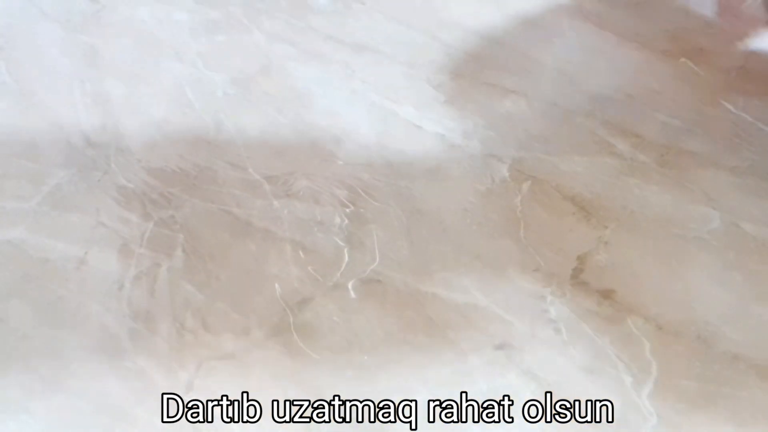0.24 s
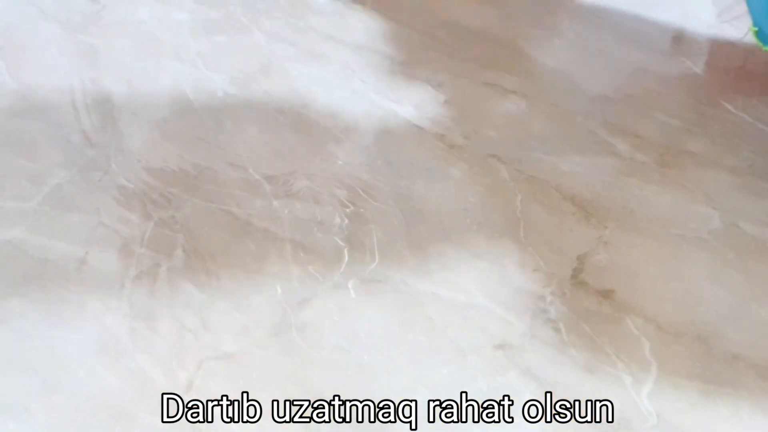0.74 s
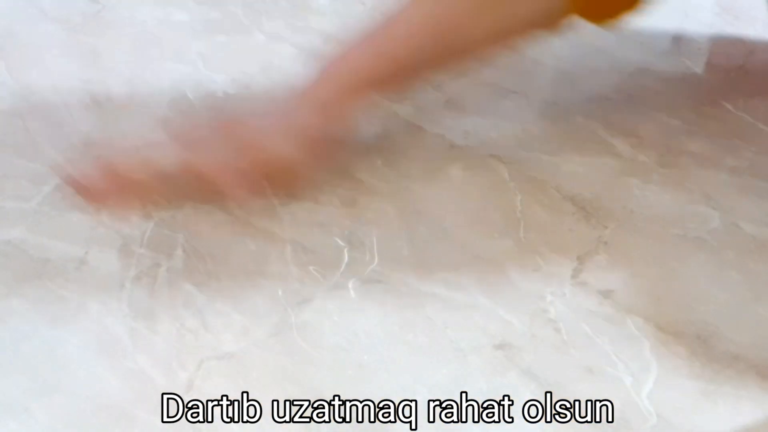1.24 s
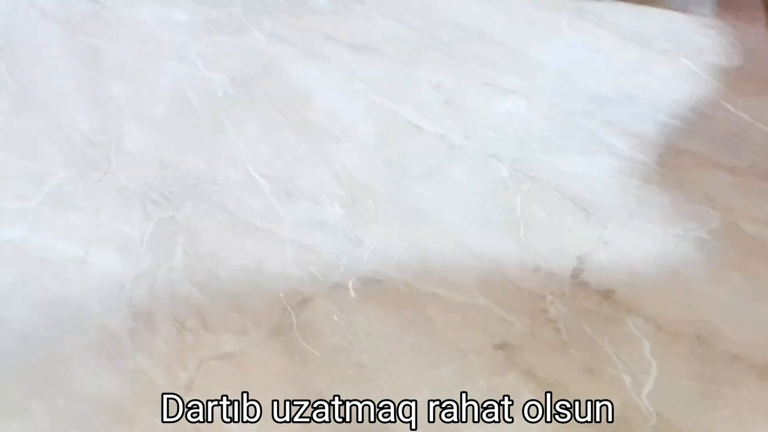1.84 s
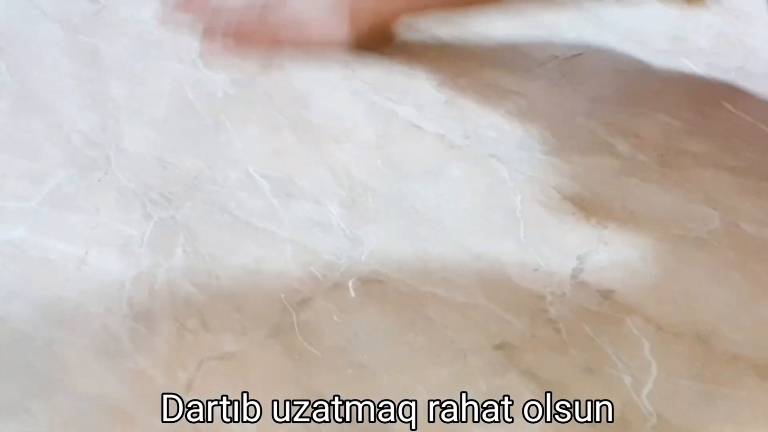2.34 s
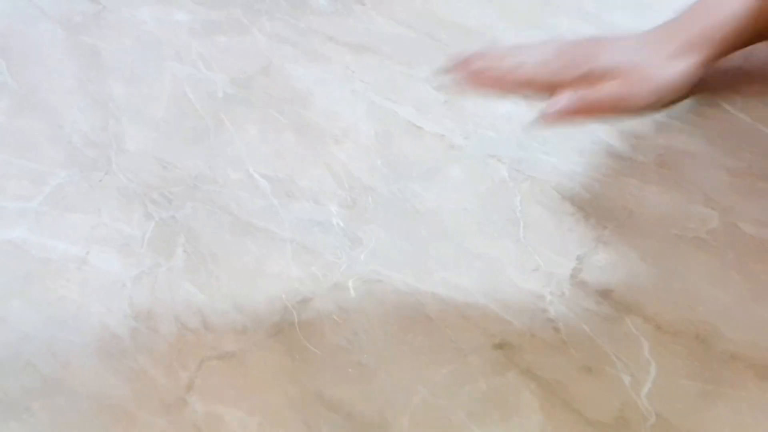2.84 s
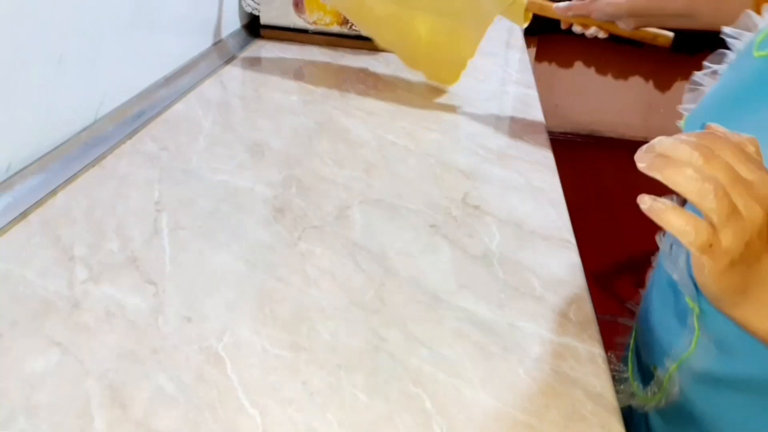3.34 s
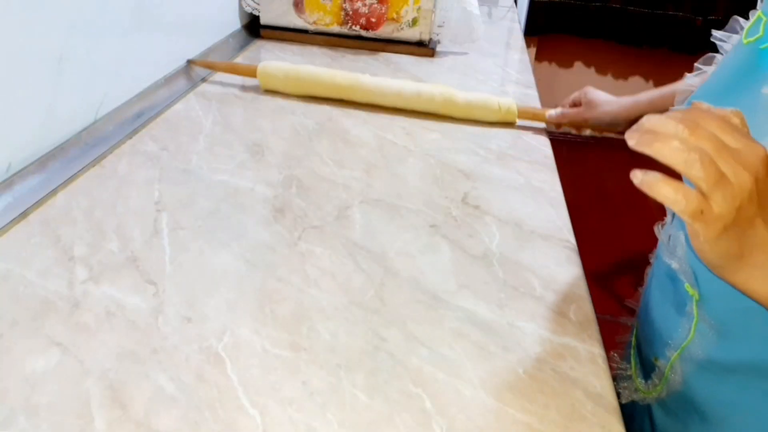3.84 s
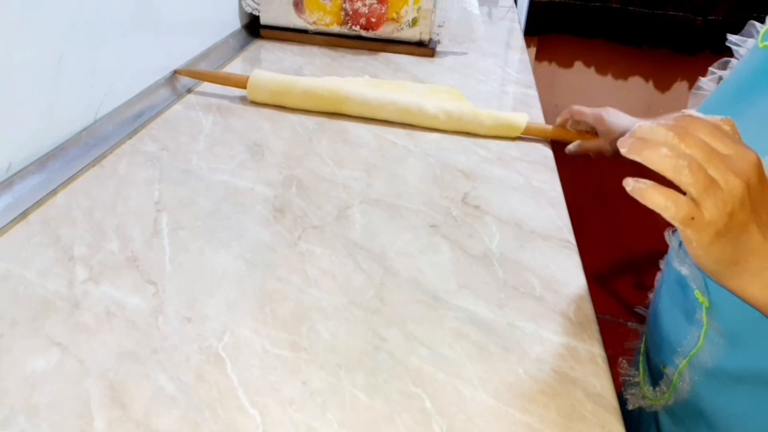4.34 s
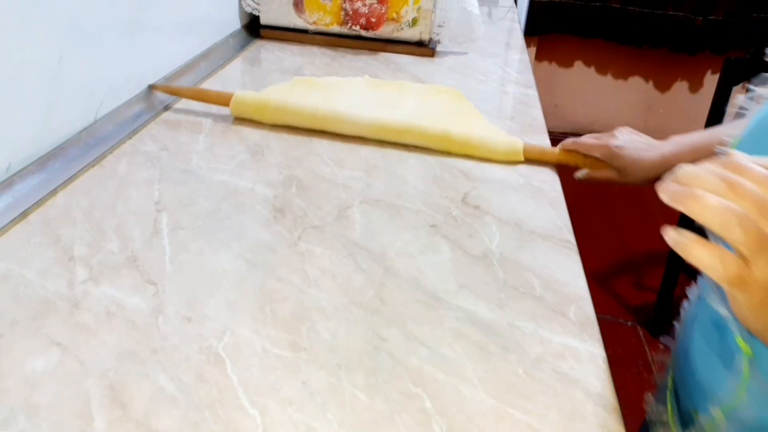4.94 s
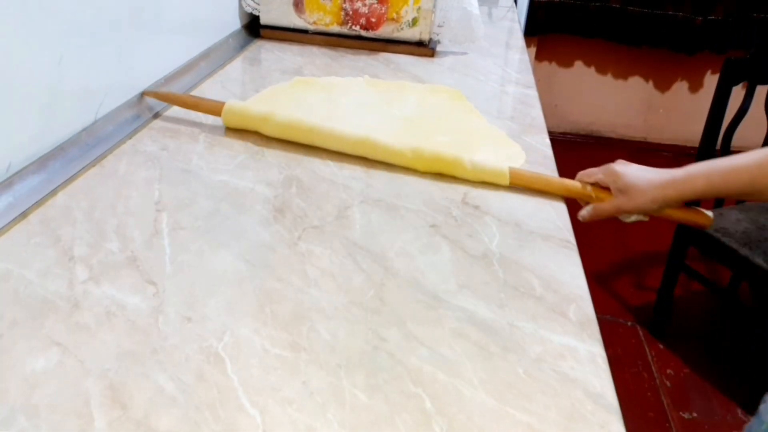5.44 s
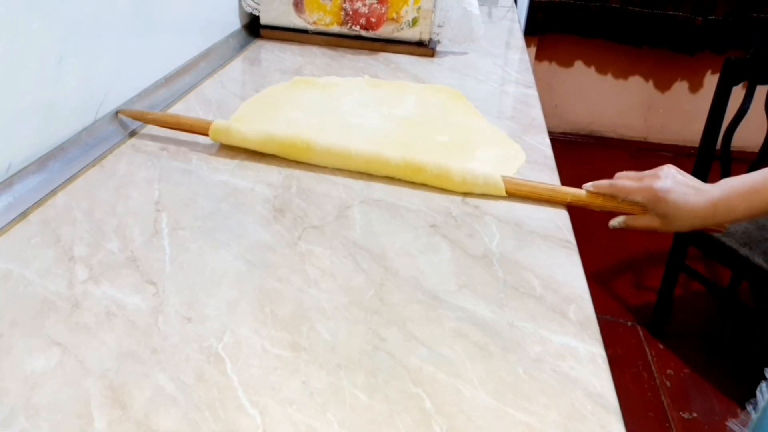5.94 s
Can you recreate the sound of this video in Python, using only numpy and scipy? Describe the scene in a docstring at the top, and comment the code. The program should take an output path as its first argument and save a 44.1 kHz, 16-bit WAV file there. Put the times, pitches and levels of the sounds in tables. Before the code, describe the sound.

A quiet, hollow appliance drone runs throughout a small, hard kitchen, heard closely in stereo, slightly to the right. From 0.1 s a palm sweeps flour across stone: a fine, bright hiss swells to about 0.6 s, surges again, and fades by 1.2 s. Two dull, low pats land at 1.7 and 1.9 s, then more strong swishes peak around 2.1 and 2.35 s, with a weaker one trailing until the hiss stops abruptly at 3.3 s. Faint dough scuffs follow. A soft, heavy thump at 3.75 s precedes the loudest event, a hard wooden knock on stone at 3.97 s with a bright tick, quick softer rebound, short ringing tail and deep boom. Near quiet follows with faint rustling. At 5.1 s muffled dough thumps and a light knock cluster; at 5.6 s a duller wooden knock comes with a brief low rumble, then a soft thump at 5.8 s and fading rustle.

```python
"""Floured counter, dough and rolling pin

A palm sweeps flour over a stone kitchen counter in long hissing strokes (shaped noise) and pats it twice.
A thin wooden pin wrapped in dough is laid down and knocks on the slab (struck modes and a dense ring);
the sheet rustles and thumps as it is unrolled. The small hard room rings after each blow.
An appliance drones in the background (low noise with one resonance)."""
import sys
import numpy as np
from scipy import signal
from scipy.fft import rfft, irfft, next_fast_len
from scipy.io import wavfile
from scipy.ndimage import map_coordinates

SR = 44100
rng = np.random.default_rng(int(sys.argv[2]) if len(sys.argv) > 2 else 0)


def log_audio(samples):
    """Write samples as a 16-bit WAV file to the path given in sys.argv[1]."""
    # one column per channel
    frames = np.atleast_2d(samples).T
    # limit to full scale, then quantise
    limited = np.clip(frames, -1, 1)
    pcm = np.round(limited * 32767).astype(np.int16)
    wavfile.write(sys.argv[1], SR, pcm)


N = 273420  # length in samples


def amp(db):
    """Amplitude factor of a level in dB."""
    return 10 ** (np.asarray(db) / 20)


def unit(x):
    """x scaled to rms 1."""
    return x / np.sqrt(np.mean(x ** 2) + 1e-20)


def along(points, hz):
    """(Hz, value) points read on a log frequency axis."""
    f, v = np.transpose(points)
    return np.interp(np.log(hz + 1), np.log(f + 1), v)


def curve(rows):
    """(s, value) rows as one value per sample."""
    return np.interp(np.arange(N) / SR, *np.transpose(rows))


def wobble(rate):
    """A smooth random curve, rate knots a second."""
    knots = rng.standard_normal(int(N * rate / SR) + 4)
    return map_coordinates(knots, [np.arange(N) * rate / SR])


def filtered(x, response):
    """x with its spectrum multiplied by a response of frequency."""
    n = x.shape[-1]
    m = next_fast_len(n + 8192)  # padded with silence
    return irfft(rfft(x, m) * response(np.fft.rfftfreq(m, 1 / SR)), m)[..., :n]


def noise(gain, n=N):
    """Diffuse stereo noise of rms 1: alike in the bass, mostly unrelated in the treble."""
    # Each row: frequency in Hz, likeness of the left and right microphones (1 = the same).
    alike = [(60, 0.99), (130, 0.86), (290, 0.87), (640, 0.49), (1400, 0), (3000, 0.19), (7000, 0)]

    def mid_side_gain(hz):
        turn = np.arccos(np.clip(along(alike, hz), -1, 1)) / 2
        return gain(hz) * np.array([np.cos(turn), np.sin(turn)])

    mid, side = filtered(rng.standard_normal((2, n)), mid_side_gain)
    return unit(np.array([mid + side, mid - side]))


def shaped(points):
    """Gain of a (Hz, dB) spectrum."""
    return lambda hz: amp(along(points, hz))


def resonance(centre_hz, width_hz):
    """Gain of one resonance, halved at width_hz from its centre."""
    return lambda hz: 1 / (1 + ((hz - centre_hz) / width_hz) ** 2)


def arch(length):
    """A smooth rise and fall, length seconds long."""
    return np.sin(np.linspace(0, np.pi, int(length * SR)))


def add(track, s, sound):
    """Mix a sound into the track from time s in seconds."""
    part = track[:, round(s * SR):][:, :sound.shape[-1]]
    part += sound[..., :part.shape[1]]


def leaning(x, points):
    """The two microphones hear x with different strength; points give left over right in dB by Hz."""
    return filtered(x, lambda hz: amp(np.array([[0.5], [-0.5]]) * along(points, hz)))


def stroke(start, rise, fall, db):
    """Loudness of one movement: it follows the speed, which rises and falls smoothly, and lingers in the room."""
    linger_t60_s = 0.4
    ramp = curve([(start, 0), (start + rise, 1), (start + rise + fall, 0)])
    speed = np.sin(np.pi / 2 * ramp)
    keep = 10 ** (-6 / (linger_t60_s * SR))  # share of the power kept per sample
    power = signal.lfilter([1 - keep], [1, -keep], speed ** 2)
    return amp(db) * np.sqrt(power)


def strokes(rows):
    """Loudness of a series of movements, their powers summed."""
    return np.sqrt(sum(stroke(*row) ** 2 for row in rows))


def background():
    """An appliance's airy drone with one hollow resonance, over faint steady hiss."""
    # Each row: frequency in Hz, relative level in dB per Hz; first the drone, then the hiss.
    drone_spectrum = [(20, -40), (35, -40), (55, -13), (85, -13), (116, -3.5), (170, -18), (240, -12.5),
                      (390, -9), (500, -8.5), (800, -25), (1150, -27), (1350, -34.5), (1700, -26.5),
                      (2200, -45.5)]
    air_spectrum = [(800, -1), (2200, 15.5), (7000, -8), (10000, -1), (15500, -3.5)]
    # Each row: time in seconds, relative drone level in dB.
    drone_level = [(0.0, -57), (0.45, -53.5), (1.6, -55.5), (3.75, -54), (4.0, -57.5), (6.2, -56)]
    hollow = noise(resonance(318.0, 28.0))
    drone = amp(-1.5) * noise(shaped(drone_spectrum)) + amp(-1.5) * hollow
    level_db = curve(drone_level) + 0.92 + 0.54 * wobble(4.37)
    return amp(level_db) * drone + amp(-78) * noise(shaped(air_spectrum))


def palm():
    """Countless flour grains shear under the skin: a fine hiss that stops short with the last stroke."""
    # Each row: start in seconds, time to full speed in s, time to rest in s, relative hiss level in dB.
    sweeps = [(.11, 0.43, .07, -44.5), (.605, 0.043, 0.36, -44), (.93, 0.24, 0.26, -55),
              (1.67, 0.13, 0.16, -63.5), (1.87, 0.2, 0.24, -44.5), (2.18, 0.17, 0.092, -42.5),
              (2.62, 0.24, 0.87, -49), (3.21, 0.087, 0.11, -48.5)]
    # Each row: frequency in Hz, relative level of the flour hiss in dB per Hz.
    flour = [(710, -46), (1200, -18), (1650, -11.5), (2050, -7.5), (2680, -1.5), (3770, -0.5), (7730, 2),
             (9900, -2.5), (12000, 0), (15300, -1)]
    rub_spectrum = [(40, -29), (110, 14.5), (200, -37), (350, 11.0),
                    (700, -7.5), (1500, -17), (3000, -42), (9000, -70)]  # (Hz, dB per Hz)
    sweep_end_s, stop_s = 3.311, 0.0057  # the hiss starts to stop, and how long that takes
    moving = np.clip((sweep_end_s - np.arange(N) / SR) / stop_s + 1, 0, 1)
    loudness = np.hypot(strokes(sweeps), amp(-74))  # a faint hiss stays between strokes
    sweep = loudness * amp(1.56 * wobble(45)) * moving
    hiss = amp(1.24) * noise(shaped(flour))
    rub = amp(-14.5) * noise(shaped(rub_spectrum))
    return sweep * (hiss + rub)


def room_ring(n):
    """A fresh dense tail of counter and walls in which each frequency dies at its own speed."""
    # Each row: frequency in Hz, relative level in dB per Hz.
    clatter = [(20, -61), (60, -10.5), (140, -7), (200, -3), (300, 5), (410, -5.5), (520, -3.5),
               (800, -6.5), (980, -9.5), (1250, -7.5), (2000, -12), (3200, -13.5), (6000, -16), (15000, -7)]
    # The small hard room. Each row: frequency in Hz, t60 in seconds.
    room_t60 = [(80, 1), (300, 0.4), (1000, 0.5), (3000, 0.55), (8000, 0.75), (15000, 0.73)]
    hz, t, z = signal.stft(noise(shaped(clatter), n), SR, nperseg=256)
    decay = amp(-60 * t / along(room_t60, hz)[:, None])
    return signal.istft(z * decay, SR, nperseg=256)[1][:, :n]


def ringing(modes, t):
    """Struck modes (Hz, dB, t60 s); strength and phase vary at random from blow to blow."""
    hz, level, t60 = np.transpose(modes)[:, :, None]
    strength = amp(level + rng.standard_normal(hz.shape) - 60 * t / t60)
    # high modes reach the two microphones out of step
    apart = rng.choice([-1, 1], hz.shape) * np.minimum(hz / 1200, np.pi / 4)
    phase = rng.uniform(0, 2 * np.pi, hz.shape) + np.array([[[1]], [[-1]]]) * apart
    return np.sum(strength * np.sin(2 * np.pi * hz * t + phase), axis=1)


def blow(contact_hz, thump_db, tick_db, modes_db):
    """Palm, dough and bare pin ring the same counter; a soft contact passes only its low modes."""
    # Modes of the counter. Each row: frequency in Hz, relative level in dB, t60 in s before contact damping.
    counter = [(171.3, -3, 0.22), (205.4, -3, 0.23), (232, -7, 0.12), (268.8, 1.5, 0.14), (320, -11.5, 0.2),
               (466, -5.5, 0.34), (559, -8.5, 0.38), (627, -9, 0.37), (724, -13, 0.43), (782, -6.5, 0.26),
               (820, -12.5, 0.54), (860, -16, 0.28), (1130, -20, 0.52), (1162, -12, 0.36), (1196, -16, 0.3)]
    # Lowest bending mode of the slab: frequency in Hz, t60 in seconds before contact damping.
    slab_hz, slab_t60 = (112, 0.34)
    # Hard contact on stone. Each row: frequency in Hz, relative level in dB per Hz.
    tick_spectrum = [(500, 3), (2000, 6), (3800, -14), (5200, -1), (8000, 0), (11000, -15), (15000, -22)]
    # What the walls return of the tick. Each row: frequency in Hz, gain in dB.
    echo_gain = [(1000, -34), (2500, -1), (4000, 3.5), (7000, -2), (10000, -9.5), (15000, -17)]
    t = np.arange(SR * 3 // 4) / SR
    fade_db = -5 * np.clip((t - 0.11) / 0.1, 0, 1)  # the late ring drops by a further 5 dB
    room = room_ring(len(t))
    contact = signal.butter(2, min(contact_hz, SR / 3), fs=SR)
    ring = signal.lfilter(*contact, amp(modes_db) * ringing(counter, t) + amp(0.5) * room)
    swell = 1 - np.exp(-t / 0.021)
    thump = amp(thump_db - 4 - 60 * t / slab_t60) * swell * np.sin(2 * np.pi * slab_hz * t)
    # soft things press in slowly, then stay on the stone and damp it
    touch = (1 - np.exp(-t * contact_hz)) * amp(1.5 + fade_db - 15000 * t / contact_hz)
    # hard contact adds a bright tick, which the walls prolong
    tick = amp(tick_db - 7.5 - 60 * t / 0.019) * noise(shaped(tick_spectrum), len(t))
    echo = amp(tick_db - 11.0 + fade_db) * filtered(room, shaped(echo_gain))
    return touch * (ring + thump) + tick + echo


def landings():
    """A palm or the wrapped dough comes down in three quick stages."""
    # Each row: time in seconds, level in dB, contact cut-off in Hz (soft = low), slab thump in dB,
    # sharp tick in dB, lag between stages in seconds. Levels are relative.
    soft_contacts = [(1.694, -35, 487, -2, -38, .019), (1.920, -34.5, 350, 4.5, -39, .026),
                     (3.744, -33.5, 780, 8, -32, .029), (5.073, -39, 450, 6, -38, 0.032),
                     (5.146, -29, 483, -1, -12, .029), (5.803, -30, 364, 1.5, -38, .032)]
    # It touches, takes the weight, then settles.
    # Each row: level in dB, share of the cut-off, added thump in dB.
    stages = [(-0.5, 0.79, -9), (0, 0.93, 1.5), (-8.5, 0.96, -4.5)]
    out = np.zeros((2, N))
    for s, db, contact_hz, thump_db, tick_db, lag in soft_contacts:
        for k, (stage_db, share, weight_db) in enumerate(stages):
            press = blow(contact_hz * share, thump_db + weight_db, tick_db, modes_db=-14)
            add(out, s + k * lag, amp(db + stage_db) * press)
    return out


def dough():
    """The soft sheet rustles as it slides over the counter; it scuffs a few times while being lowered."""
    # Each row: start in seconds, time to full speed in s, time to rest in s, relative rustle level in dB.
    pulls = [(3.37, .03, 0.037, -72), (3.56, 0.043, 0.52, -72), (3.73, 0.073, 0.069, -58.5),
             (4.37, 0.065, .21, -71), (4.53, 0.2, .14, -71), (4.85, 0.37, 0.06, -60.5),
             (5.26, 0.15, .12, -66.5), (5.5, 0.19, 0.11, -59.5), (5.74, 0.085, 0.19, -63),
             (5.98, 0.13, 0.11, -68)]
    # Each row: frequency in Hz, relative level of the rustle in dB per Hz.
    rustle = [(300, -12), (900, -5), (2000, 0), (4000, -2), (7500, 1.5), (10000, -3), (15500, -4)]
    # Each row: start in seconds, level in dB, length in seconds, centre in Hz, width in Hz.
    scuffs = [(3.319, -64.5, 0.13, 920, 350), (3.572, -67.5, .1, 2060, 150), (3.583, -65, 0.092, 3060, 600),
              (3.653, -64.5, 0.095, 1870, 910), (3.759, -58.5, 0.087, 1980, 896)]
    out = strokes(pulls) * amp(2.9 + 0.69 * wobble(35)) * noise(shaped(rustle))
    for s, db, length, hz, width_hz in scuffs:
        swell = arch(length)
        add(out, s, amp(db) * swell * noise(resonance(hz, width_hz), len(swell)))
    return out


def rumble():
    """Low noise follows the turning speed of the pin as the sheet winds off."""
    # Each row: start in seconds, time to full speed in s, time to rest in s, level in dB.
    turns = [(3.6, 0.18, .06, -58), (5.585, .015, 0.1, -39.5), (5.78, .03, 0.063, -59)]
    spectrum = [(12, -35), (22, -22), (32, -5), (45, 2),
                (62, -5), (90, -8), (200, -32), (1000, -100)]  # (Hz, dB per Hz)
    return strokes(turns) * noise(shaped(spectrum))


def knocks():
    """One end of the pin clacks on the stone, the other follows, and the pin rebounds once, softer."""
    # Each row: time in seconds, level in dB, contact cut-off in Hz, sharp tick in dB,
    # clack of the bare end in dB, time to the rebound in seconds. Levels are relative.
    hits = [(3.970, -19.5, 1600, -2.5, -35, 0.078), (5.141, -32, 680, -35, -40.5, .04),
            (5.593, -26, 960, -27, -27.5, .094)]
    # Bending modes of the wooden pin. Each row: frequency in Hz, relative level in dB, t60 in seconds.
    pin = [(268.6, 4, 0.14), (491, -3, 0.24), (870, -11, 0.24), (1144, -6.5, 0.12), (1380, -6.5, 0.14),
           (1600, -13, 0.26), (1910, -23, 0.17), (2320, -43, .15)]
    far_end = (0.021, -9, 0.88)  # (delay s, dB, share of the cut-off)
    rebound_db, rebound_softer = -7, 0.54  # level, share of the cut-off
    out, t = np.zeros((2, N)), np.arange(SR * 3 // 4) / SR
    for s, db, contact_hz, tick_db, clack_db, rebound_s in hits:
        add(out, s, amp(db) * blow(contact_hz, thump_db=-1, tick_db=tick_db, modes_db=-8.5))
        add(out, s, amp(clack_db - 4.0) * ringing(pin, t) * (1 - np.exp(-t / 0.00033)))
        for delay, loss_db, softer in [far_end, (rebound_s, rebound_db, rebound_softer)]:
            follow = blow(contact_hz * softer, thump_db=-16, tick_db=-34, modes_db=-8)
            add(out, s + delay, amp(db + loss_db) * follow)
    return out


def booms():
    """Deep resonances of wavering pitch swell and fade after the first knock."""
    # Each row: start in seconds, rise in seconds, fall in seconds, level in dB, mean pitch in Hz.
    hums = [(3.971, 0.024, 0.04, -38.5, 67.1), (4.2, 0.22, .18, -52.5, 68.1)]
    waver_hz = 2.0
    out = np.zeros(N)
    for start, rise, fall, db, hz in hums:
        pitch = hz + waver_hz * wobble(27.4)
        out += stroke(start, rise, fall, db) * np.sin(2 * np.pi * np.cumsum(pitch) / SR)
    return out


def scene():
    """Rubbing and drone fill the room; the blows come from the counter."""
    # Side from which the sound arrives. Each row: frequency in Hz, left over right in dB.
    room_lean = [(60, -9), (120, -5), (280, -1.5), (560, -3.5), (1100, -10.5), (1700, -9.5), (2500, -1.5),
                 (4400, -1.5), (8000, -2.3), (12500, 1)]
    blow_lean = [(120, -2), (280, -2), (1100, -3.5), (2000, -3.5), (4400, -2), (12500, 0.5)]
    around = background() + palm() + dough()
    counter_blows = landings() + rumble() + knocks() + booms()
    return leaning(around, room_lean) + leaning(counter_blows, blow_lean)


def record(dry):
    """The deepest bass and everything above the band limit are cut."""
    top_hz = 15520
    thin = signal.sosfilt(signal.butter(6, 35, "highpass", fs=SR, output="sos"), dry)
    return filtered(thin, lambda hz: hz < top_hz)


dry = scene()
out = record(dry)
log_audio(out)
```